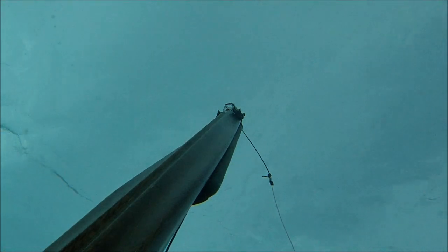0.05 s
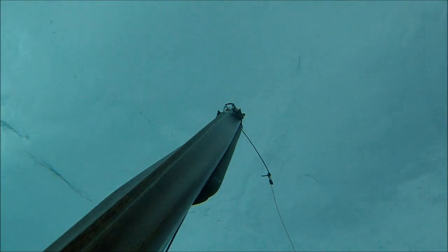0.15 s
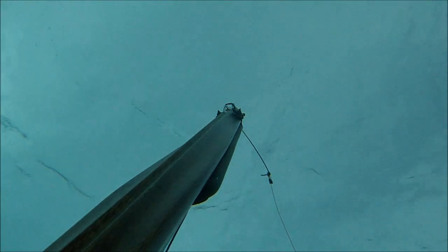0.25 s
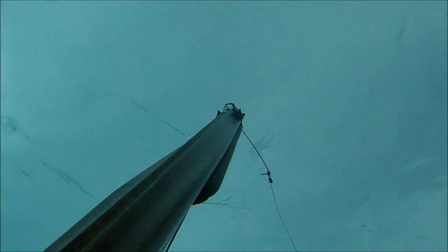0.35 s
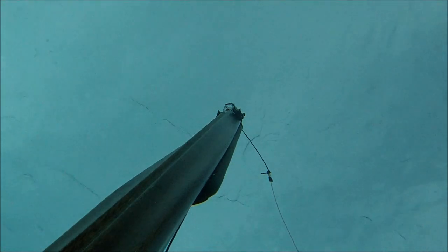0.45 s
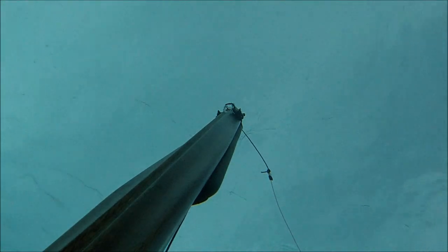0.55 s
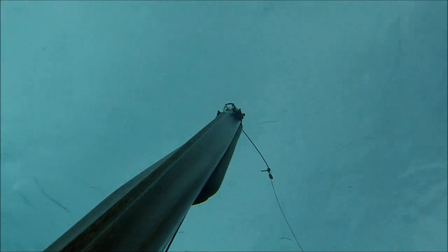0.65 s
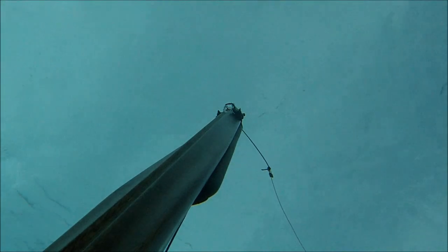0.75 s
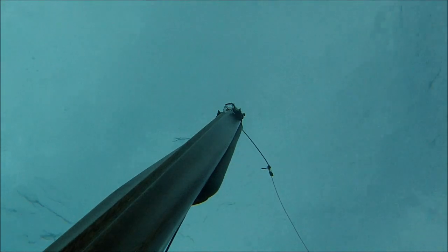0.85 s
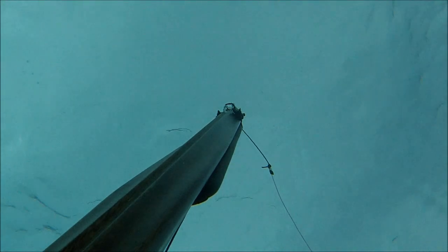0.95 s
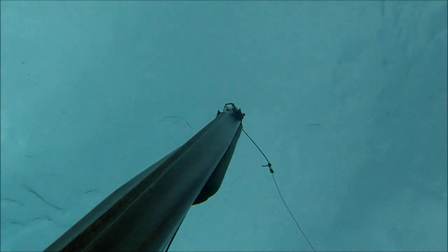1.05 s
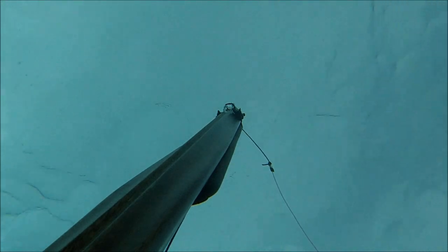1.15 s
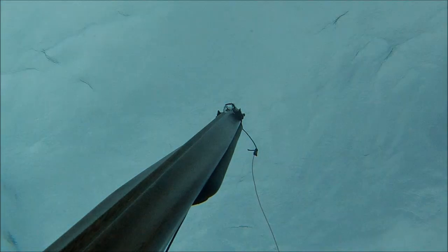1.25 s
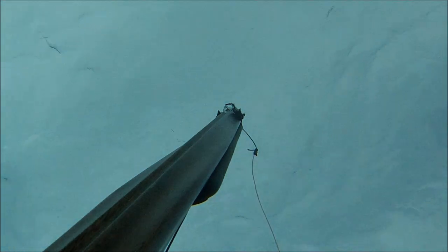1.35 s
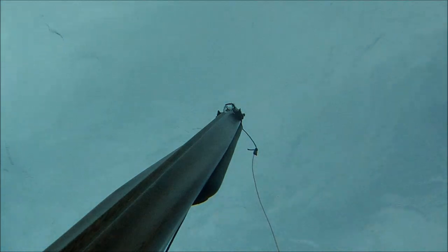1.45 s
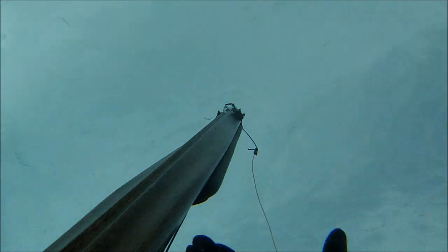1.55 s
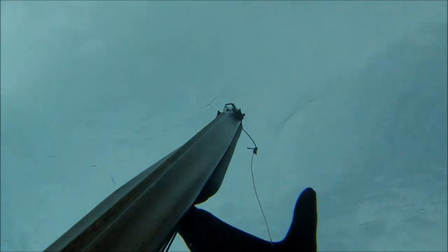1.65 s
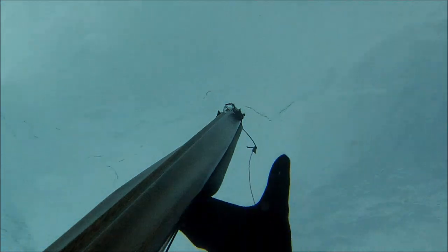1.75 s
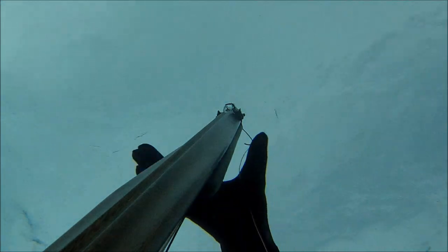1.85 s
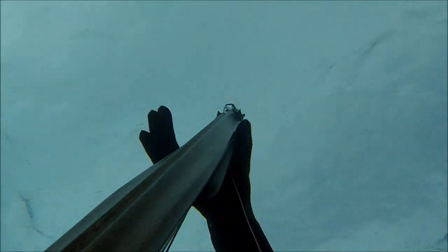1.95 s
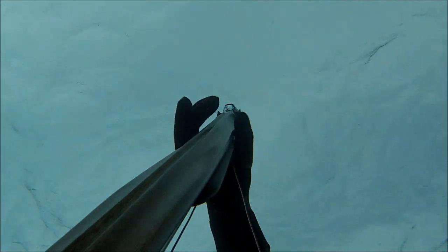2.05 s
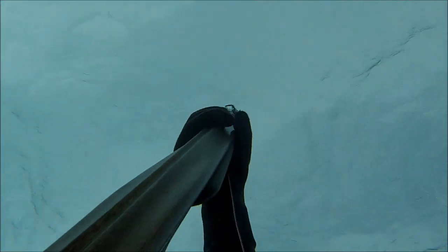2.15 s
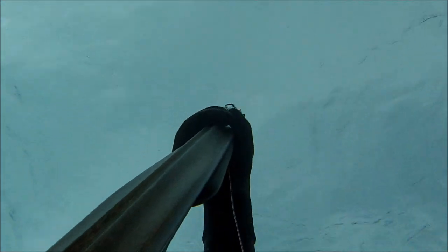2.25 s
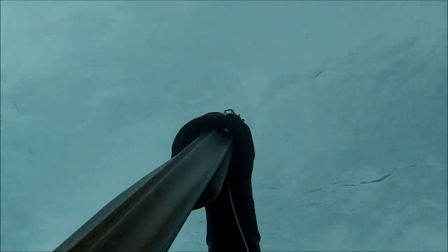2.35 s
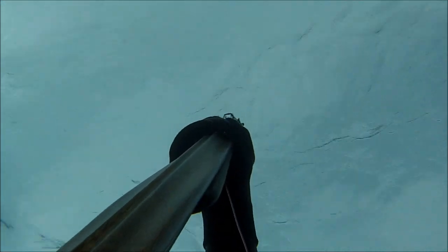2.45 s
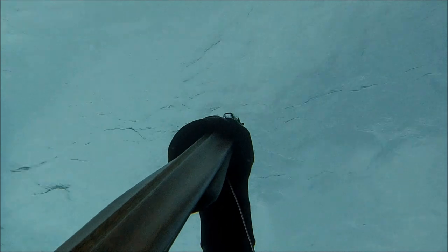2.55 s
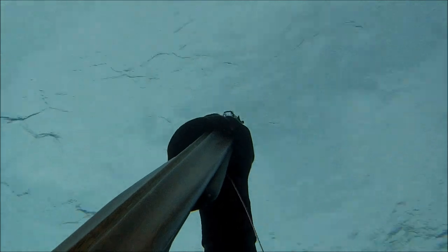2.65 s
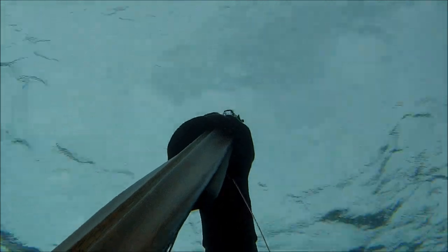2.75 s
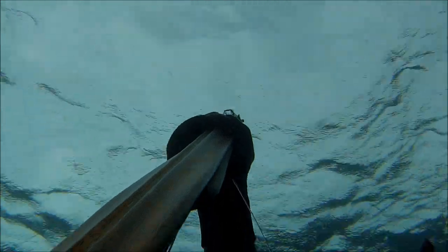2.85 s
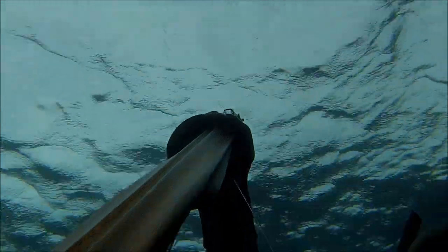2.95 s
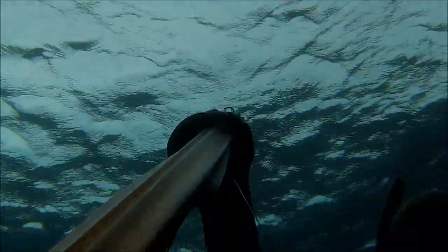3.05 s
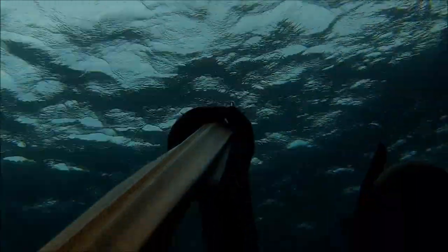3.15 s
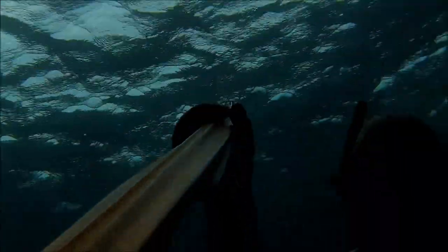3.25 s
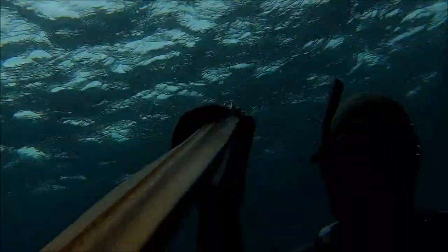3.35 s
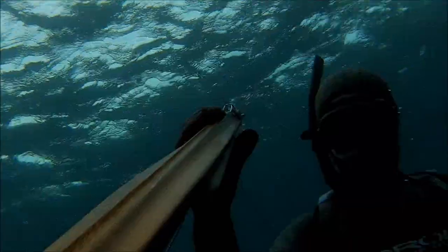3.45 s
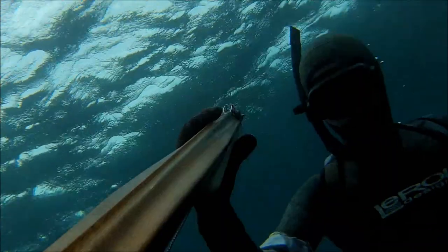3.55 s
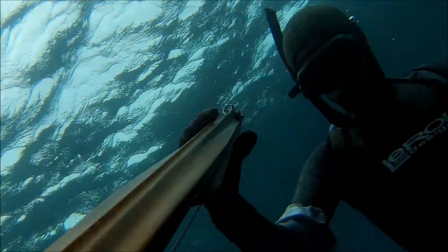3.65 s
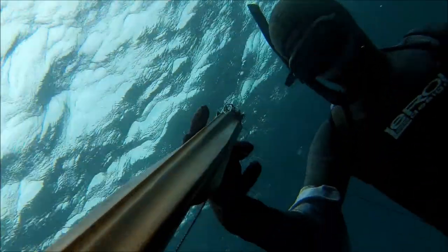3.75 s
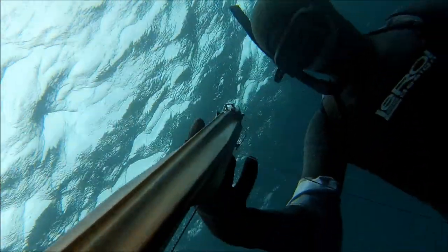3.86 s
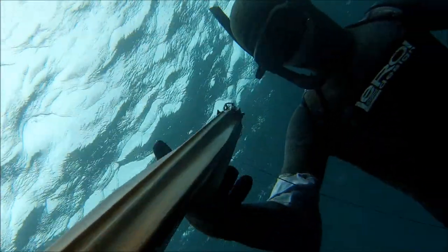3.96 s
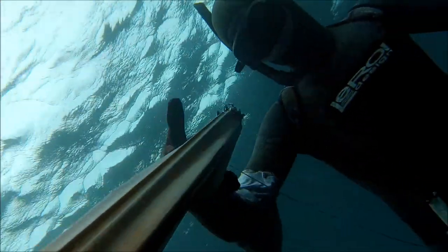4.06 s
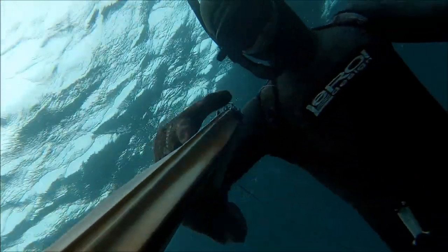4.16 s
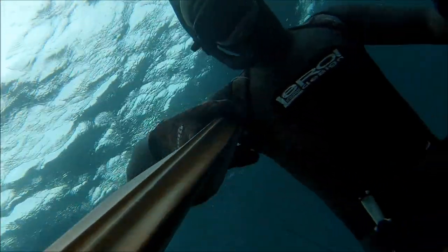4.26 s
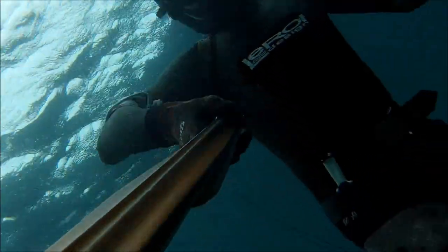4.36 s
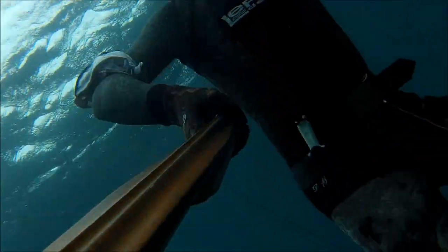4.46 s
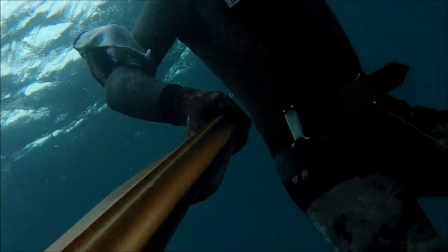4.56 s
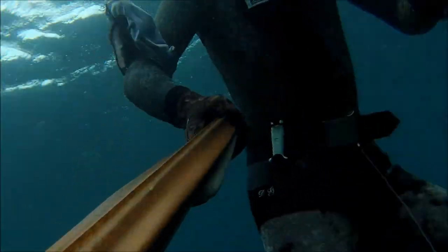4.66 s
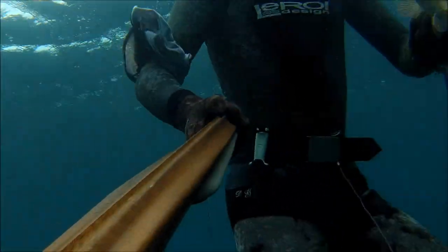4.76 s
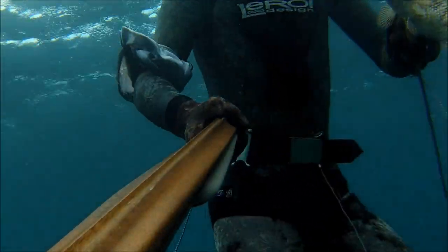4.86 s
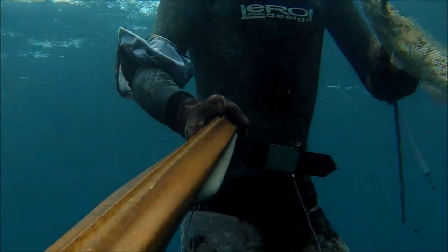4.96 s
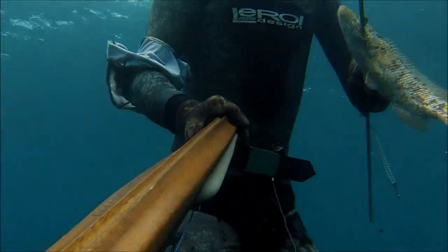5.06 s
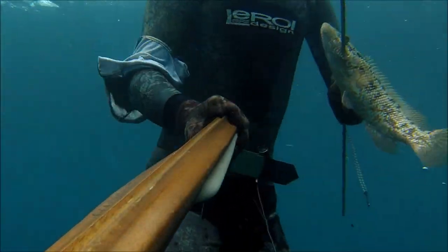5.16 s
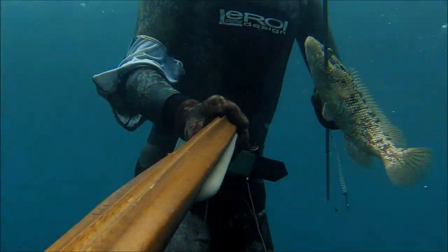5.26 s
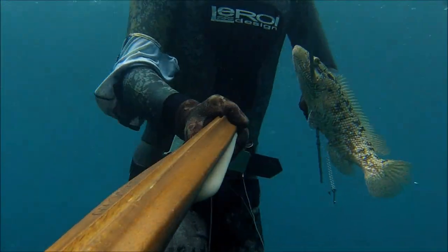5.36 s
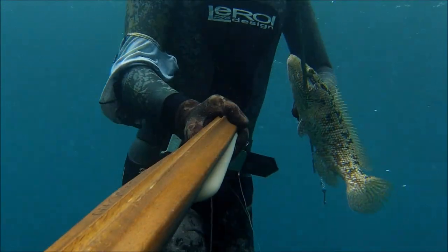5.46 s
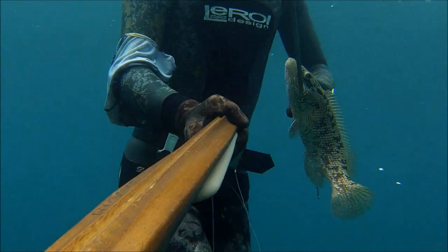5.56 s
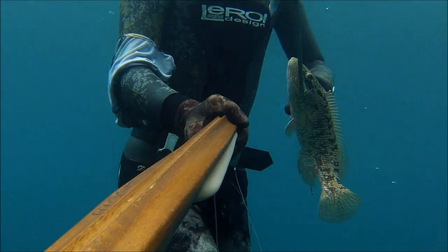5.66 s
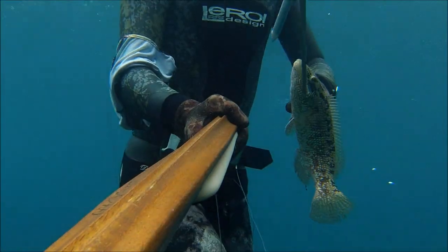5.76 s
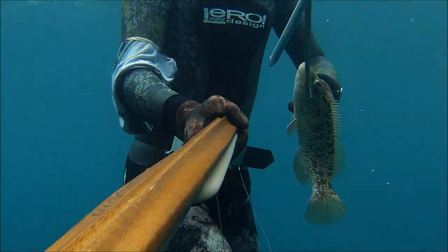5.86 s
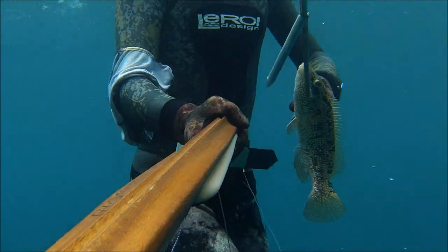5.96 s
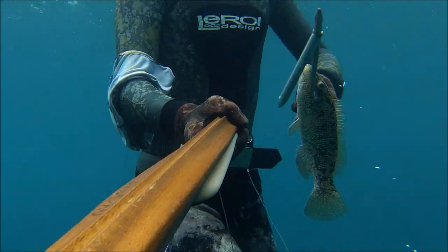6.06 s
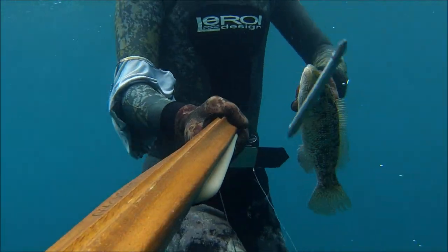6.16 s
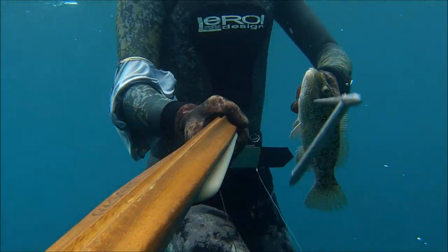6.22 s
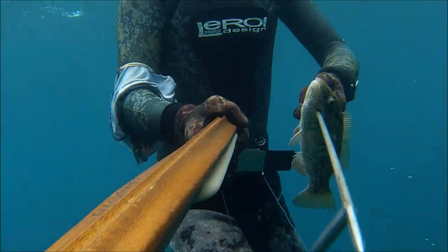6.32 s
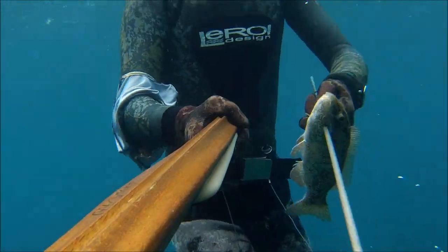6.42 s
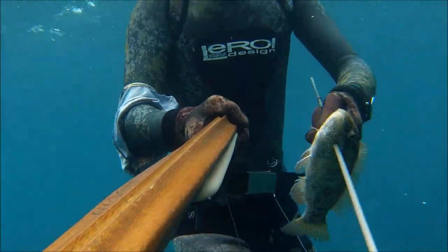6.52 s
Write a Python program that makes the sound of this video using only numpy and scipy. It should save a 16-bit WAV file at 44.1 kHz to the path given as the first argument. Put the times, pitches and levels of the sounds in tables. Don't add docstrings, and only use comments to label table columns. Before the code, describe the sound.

Underwater, through the housing of a camera clamped to a wooden speargun. From 0 to 2 s it is quiet: faint uneven wash, fine shrimp crackle with brighter snaps, thin high recorder hiss pulsing on and off, faint gritty rubs and a few light ticks near 0.3, 1.0 and 1.65 s. At about 2.05 s a gloved hand closes on the barrel; deep throbbing and dragged water rise, with a strong heave at 2.3 s. Clumped knocks and dull bumps strike at 2.55-2.85 and 3.05 s. At 3.33 s steel hits the housing, by far the loudest event, bouncing rapidly with a brief hollow ring, then again more weakly at 3.45 s. From 3.6 to 5 s, heavy low heaves and shudders dominate, with muffled rubbing. Afterwards the throbs subside; small clicks cluster at 5.65 s, a firmer knock lands at 6.29 s, and scrapes and snaps carry on to 6.6 s.

```python
import sys
import numpy as np
from scipy import signal
from scipy.fft import rfft, irfft, next_fast_len
from scipy.io import wavfile
from scipy.ndimage import uniform_filter1d, map_coordinates

SR = 44100
rng = np.random.default_rng(int(sys.argv[2]) if len(sys.argv) > 2 else 0)


def pcm_store(signal):
    levels = np.round(np.clip(np.atleast_2d(signal), -1, 1) * 32767)
    wavfile.write(sys.argv[1], SR, levels.astype(np.int16).T)


def level_to_linear(level):
    exponent = np.asarray(level, float) / 20
    return 10 ** exponent


N = 290619


def unit(x):
    return x / np.sqrt(np.mean(x ** 2) + 1e-20)


def curves(rows):
    s, *cols = np.transpose(rows)
    return [np.interp(np.arange(N) / SR, s, c) for c in cols]


def wobble(rate_hz):
    at = np.arange(0, N + 16, 16)
    knots = rng.standard_normal(int(N * rate_hz / SR) + 4)
    return np.interp(np.arange(N), at, map_coordinates(knots, [at * rate_hz / SR]))


def filtered(x, response):
    m = next_fast_len(N + SR // 2)
    return irfft(rfft(x, m) * response(np.fft.rfftfreq(m, 1 / SR)), m)[..., :N]


def dulled(x, top_hz):
    return signal.sosfilt(signal.butter(4, top_hz, fs=SR, output="sos"), x)


def coloured(spectrum):
    hz, db = np.transpose(spectrum)
    noise = rng.standard_normal(N)
    return unit(filtered(noise, lambda f: level_to_linear(np.interp(np.log(f + 1), np.log(hz + 1), db))))


def ringing(x, modes):
    def response(f):
        total = 0
        for k, (hz, width_hz, db) in enumerate(modes):
            total = total + (-1) ** k * level_to_linear(db) * 1j * f * width_hz / (hz * hz - f * f + 1j * f * width_hz)
        return total * SR / (2 * np.pi * sum(width_hz * level_to_linear(db) for _, width_hz, db in modes))
    return filtered(x, response)


def tone(hz):
    return np.sqrt(2) * np.sin(2 * np.pi * np.cumsum(hz * np.ones(N)) / SR)


def gate(spans, gains, soft_s):
    x = np.zeros(N + SR)
    for (start, end), gain in zip(spans, gains):
        x[round(start * SR):round(end * SR)] += gain
    return uniform_filter1d(x, int(soft_s * SR) + 1)[:N]


def swells(s, db, t60_s, rise_db_per_s):
    at = np.arange(0, N + 64, 64)
    t = at / SR - np.array(s)[:, None]
    slope = np.where(t < 0, rise_db_per_s, -60 / np.clip(t60_s, .05, 9)[:, None])
    gain = np.sqrt(np.sum(level_to_linear(2 * (db[:, None] + slope * t)), 0))
    return np.interp(np.arange(N), at, gain)


def blows(times, levels_db, t60s, scrape_db):
    x, t = np.zeros(N + SR), np.arange(SR // 5) / SR
    for s, db, t60 in zip(times, levels_db, t60s):
        grit = rng.standard_normal(len(t)) * rng.exponential(size=len(t))
        burst = level_to_linear(scrape_db - 60 * t / np.clip(t60, .004, .3)) * grit
        burst[0] = 1
        x[round(s * SR):][:len(t)] += level_to_linear(db) * burst
    return x[:N]


# time in seconds, pressure in dB.
GRIP_PRESSURE = [(0, -9), (.27, -2.5), (1, -16.5), (1.87, -13.5), (2.4, 7), (3.1, -2), (3.28, 4.5),
                 (3.78, -0.5), (4.09, 5.5), (4.4, 6.5), (4.68, 6), (5.17, -4), (5.73, -8.5), (6.59, -17)]
# level in dB at middle pressure, growth in dB per dB of pressure.
RESTING_GRIT = [
    (-56, 1.4),
    (-56.5, 1.22),
    (-64, 1.38),
]


def resting():
    press_db, = curves(GRIP_PRESSURE)
    return [db + grows * press_db for db, grows in RESTING_GRIT]


# pitch in Hz, level in dB rms.
WHINE = [(11130, -82)]
WRITES = [.05, .23, .38, .65, .92, 1.4, 1.47, 1.54, 1.73, 1.99, 2.21, 2.41, 2.58, 2.81, 3.12, 3.36, 3.63,
          3.84, 4.05, 4.22, 4.44, 4.69, 4.95, 5.17, 5.36, 5.56, 5.75, 6.01, 6.21, 6.42]


def electronics():
    write_s = 0.074
    hiss = coloured([(8000, -61), (9600, 7.5), (10600, 5.0), (12000, 4), (13500, -34)])
    writing = gate([(s, s + write_s) for s in WRITES], np.ones(len(WRITES)), soft_s=0.0073)
    return level_to_linear(-68.5) * writing * hiss + sum(level_to_linear(db) * tone(hz) for hz, db in WHINE)


# frequency in Hz, density in dB per Hz.
WASH = [(15, -8), (45, 2), (90, -2.5), (200, -13), (620, -10.5), (1000, -20.5), (1600, -22.5),
        (2360, -26.5), (2900, -24), (7100, -31), (10600, -28.5), (15500, -36.5)]


def water():
    hz, _, z = signal.stft(coloured(WASH), SR, nperseg=512)
    patches = uniform_filter1d(rng.standard_normal(z.shape), 8, 0)
    patches = unit(uniform_filter1d(patches, 6, 1))
    depth_db = np.interp(hz, [100, 1000, 11000, 14000], [1.2, 3.54, 1.8, 3.4])[:, None]
    wash = signal.istft(z * level_to_linear(depth_db * patches), nperseg=512)[1][:N]
    return level_to_linear(-56.5) * unit(wash)


# frequency in Hz, width in Hz, level in dB.
SNAP_LOW = [(2320, 270, 2), (3780, 343, -3.5)]
SNAP_TOP = [(4560, 1230, 1), (7190, 930, 2.5), (10430, 1000, -0.5), (13600, 2100, -10.5)]
# start in seconds, peak in dB.
FAR = [(.02, -57), (0.077, -45), (0.2494, -47), (1.52, -42), (1.647, -34.5), (1.764, -45.5), (1.854, -42.5),
       (2.1826, -44.5), (2.4102, -46), (2.47, -46.5), (2.6327, -48.5), (2.751, -45), (2.959, -49),
       (3.972, -39.5), (4.6665, -40), (4.74, -36), (5.042, -46), (5.436, -39), (6.352, -45.5), (6.438, -44),
       (0.574, -49), (.825, -62), (.94, -50), (1.441, -46), (1.5, -51), (1.73, -56), (1.829, -46),
       (1.895, -54), (2.3, -53), (4.369, -42), (4.8, -49), (4.815, -50), (5.282, -54), (5.633, -52),
       (5.895, -56), (6.0, -45), (6.526, -52)]
NEAR = [(0.0533, -44.5), (0.607, -40.5), (0.77, -45.5), (0.978, -39), (2.081, -48), (3.0074, -44.5),
        (4.111, -42.5), (4.204, -44.5), (4.239, -44.5), (4.43, -48), (4.51, -36), (4.5615, -51.5),
        (4.9533, -37.5), (5.256, -47.5), (5.313, -40), (5.499, -43.5), (5.7655, -32.5), (5.93, -38),
        (5.988, -39.5), (6.098, -49), (6.138, -49), (6.216, -48.5), (6.4708, -43)]
SMALL = [(0.912, -48.5), (1.9118, -54), (2.7, -58), (2.88, -50.5), (3.04, -52), (3.313, -67), (4.688, -51),
         (4.856, -52), (4.94, -51), (5.82, -50), (1.422, -55.5), (2.054, -62), (2.105, -60), (2.29, -57),
         (3.3, -72), (4.862, -52.5), (6.558, -55), (6.58, -56.5), (4.53, -59)]


def shrimp():
    s, db = np.transpose(FAR + NEAR + SMALL)
    top_db = np.repeat([-19, -12, -3.5], [len(FAR), len(NEAR), len(SMALL)])
    life_s = np.full(len(s), .03)
    snaps_per_s = 260 * (1 + gate([(4.4, 4.95)], [.6], soft_s=.05))
    crackle = (rng.random(N) < snaps_per_s / SR) * level_to_linear(-56 + 4.4 * np.tanh(rng.standard_normal(N)))
    crackle = crackle * (1 + level_to_linear(resting()[2] + 51.5))
    low = blows(s, db, life_s, scrape_db=-15.5) + crackle
    top = blows(s, db + top_db + 8.0, 1.03 * life_s, scrape_db=-5.5) + 2.33 * crackle
    return ringing(low, SNAP_LOW) + ringing(top, SNAP_TOP)


# frequency in Hz, width in Hz, level in dB.
BARREL_MODES = [(169, 90, -4), (282.7, 51, 5), (381.4, 121.4, 2)]
RUBBED_WALLS = [(660, 42, 0), (810, 130, -10)]
RUBBED_CLAMP = [(950, 200, -15), (1250, 90, -6), (1520, 110, -4), (1710, 150, 0), (2150, 400, -22)]
# start in seconds, length in seconds, low dB, dull dB.
WOOD_SLIDES = [(0.105, 0.082, -57.5, -51.5), (0.338, 0.054, -57, -48), (0.537, 0.038, -57, -56),
               (0.616, 0.025, -77, -56), (1.116, 0.12, -79, -55.5), (1.383, .06, -66, -57),
               (2.298, 0.056, -46.5, -55), (5.233, 0.024, -49, -60), (5.71, 0.041, -56, -55),
               (2.058, 0.044, -48.5, -54), (2.163, 0.036, -37.5, -68), (3.599, 0.066, -46, -51),
               (3.8, 0.14, -47, -58), (4.257, 0.057, -43.5, -52), (4.365, 0.088, -53, -50),
               (5.618, 0.087, -51, -43), (5.981, 0.091, -47, -55), (6.24, 0.052, -49, -41),
               (6.293, 0.037, -50, -46), (6.403, 0.036, -62, -43)]
CLAMP_SLIDES = [(2.589, 0.021, -42, -43), (2.688, 0.039, -28.5, -37), (3.096, 0.05, -42, -43.5),
                (3.196, 0.029, -69, -60), (3.373, 0.067, -56, -53), (3.471, 0.136, -58, -57),
                (3.858, 0.15, -63, -51.5), (3.996, 0.043, -72, -44.5), (4.559, 0.057, -40, -58.5),
                (4.742, 0.13, -43, -55), (5.111, 0.022, -50, -60), (5.353, 0.048, -49, -63),
                (4.486, 0.019, -41.5, -73), (5.782, 0.016, -48, -58), (5.834, 0.066, -50.5, -57.5),
                (6.563, .008, -58, -51)]


def glove():
    s, length_s, low_db, dull_db = np.transpose(WOOD_SLIDES + CLAMP_SLIDES)
    spans = np.transpose([s, s + length_s])
    bright_db = dull_db + np.repeat([-22, -1.3], [len(WOOD_SLIDES), len(CLAMP_SLIDES)])
    slides_db = [low_db, dull_db, bright_db]
    total = np.zeros(N)
    for rest_db, slide_db, modes in zip(resting(), slides_db, [BARREL_MODES[1:], RUBBED_WALLS, RUBBED_CLAMP]):
        level = level_to_linear(rest_db - 9.5 + 6.3 * np.tanh(wobble(14)))
        level = level + gate(spans, level_to_linear(slide_db - 3.5), soft_s=0.013)
        clumps = level_to_linear(3.06 * wobble(35) + 2.6 * wobble(140))
        total += level * unit(ringing(clumps * rng.standard_normal(N), modes))
    return dulled(total, top_hz=2360)


# start in seconds, peak
# in dB, pitch in Hz.
TAPS = [(0.277, -35, 1350), (.318, -47, 2450), (.533, -44.5, 1510), (.96, -47, 1650), (0.982, -33, 2450),
        (1.647, -32.5, 4770), (1.648, -34, 9600), (2.157, -44, 2530), (2.156, -31, 680), (2.692, -29, 870),
        (6.286, -25, 1064), (2.245, -47, 1260), (2.451, -50, 1600), (2.498, -40, 1420), (2.592, -37, 1800),
        (2.593, -27.5, 878), (2.604, -35, 1410), (2.69, -24, 1390), (2.724, -31, 925), (2.729, -43, 1600),
        (2.85, -43, 1760), (3.071, -43, 1800), (3.1, -44, 1500), (4.076, -49, 1250), (4.11, -46, 1930),
        (4.206, -42, 1400), (4.317, -58, 960), (4.429, -46, 1200), (4.515, -42, 1340), (4.57, -41, 1300),
        (4.585, -43, 1630), (4.861, -49, 1300), (5.112, -53, 1580), (5.195, -50, 1500), (5.205, -55, 1600),
        (5.277, -46.5, 679), (5.358, -46, 1620), (5.378, -42, 1510), (5.37, -44, 670), (5.619, -42, 1610),
        (5.64, -52, 1500), (5.646, -54, 1600), (5.657, -29.5, 1540), (5.664, -36, 1760), (5.678, -39, 1350),
        (5.717, -51, 2400), (5.86, -49, 1500), (5.875, -56, 1600), (5.961, -43, 1320), (5.969, -49, 1480),
        (5.9825, -36.5, 1540), (6.019, -45, 1500), (6.173, -48, 2200), (6.33, -51, 1190), (6.416, -52, 930),
        (6.455, -46, 1300), (6.562, -39.5, 1630)]
# start in
# seconds, peak in dB, pitch in Hz.
LUMPS = [(2.17, -41, 534), (2.186, -43, 305), (2.7014, -16, 384), (3.878, -32, 613), (5.612, -35, 705),
         (5.642, -40, 724), (5.659, -29, 690), (5.663, -33, 780), (5.986, -51, 690), (5.994, -45, 700),
         (6.039, -37, 660), (6.256, -44, 673), (6.293, -33, 750), (3.328, -23, 403), (3.3281, -22, 510),
         (2.717, -28, 298), (6.577, -47, 600), (.35, -37, 645), (.37, -47, 700), (3.4519, -19.5, 760),
         (2.845, -31, 904), (3.042, -24, 870), (6.428, -37, 640), (6.4445, -35.5, 976), (6.456, -42, 900)]


def taps():
    x, t = np.zeros(N + SR), np.arange(SR // 20) / SR
    for rows, cycles_to_60db in [(TAPS, 34.3), (LUMPS, 19.5)]:
        for s, db, hz in rows:
            rough = 1 + 0.28 * unit(uniform_filter1d(rng.standard_normal(len(t)), size=30))
            level = level_to_linear(db - 60 * t * hz / cycles_to_60db) * (1 - np.exp(-t / 0.0003))
            x[round(s * SR):][:len(t)] += level * rough * np.sin(2 * np.pi * hz * t)
    return x[:N]


# frequency in Hz, width in Hz, level in dB.
DAMPED_WALLS = [(522, 107, -5), (640, 70, 4.5), (904, 62, -1.5)]
PORT = [(2920, 450, 0), (3450, 330, 8), (5050, 420, -4)]
# click in Hz, lens port crack in dB for a middling click.
FITTINGS = [
    (1050, -63),
    (1400, -54),
    (2200, -67),
]
# start in seconds, peak in dB, thud in dB, click in dB.
ON_WOOD = [(0.348, -36, -12, -13), (1.03, -41.5, -9, -19), (2.154, -46, 3, -35), (2.708, -24, -9, 3.5),
           (2.85, -45, -6, -16), (3.07, -28, -3.5, -6), (3.15, -48.5, 13.5, 10), (4.271, -44, 1, 5.5),
           (4.368, -49.5, 12, -4), (4.659, -47, 2, 4), (4.715, -33, -8, -5), (4.772, -47, 12.5, -27.5),
           (5.236, -43, 0, -36), (5.447, -37.5, -6.5, -9), (6.023, -34.5, -4, -10),
           (6.285, -24.5, -6, -1.5), (6.293, -44, -25, -25), (6.309, -39, -4, -2), (6.444, -38, -5, -5)]
ON_CLAMP = [(0.274, -43, -1, 11.5), (0.525, -37, -23, -13), (2.488, -37.5, 7.5, -23), (2.565, -28.5, 1, 6),
            (2.583, -27, -8, -7), (2.589, -32, -2, -8), (2.7, -22, 6.5, 3), (2.716, -29.5, -2, -3),
            (2.841, -23, -2, 6), (3.0396, -25, 3, 8), (3.048, -29, -21, 2.5), (3.116, -35, -4, 3.5),
            (3.126, -36, -18, -1), (3.229, -44.5, -0.5, 0.5), (3.901, -46.5, 14, -16),
            (4.973, -31.5, -7.5, -5), (5.39, -54.5, 11, -13), (5.58, -43, -16, -12), (5.656, -29, -31, -13),
            (5.624, -44, -18, -19), (5.643, -39, -24, -20), (5.668, -32.5, -8, -18), (5.69, -40.5, -9, -8),
            (5.964, -52.5, 16, -7), (5.985, -51, 8, -8), (6.562, -41, -4, -10)]
ON_SWIVEL = [
    (.311, -44.5, -0.5, -10),
    (.368, -47, -27, -1),
    (0.978, -38, -21, 5),
    (1.396, -43.5, -11, -9),
    (1.652, -43.5, -20, -6),
    (1.795, -44.5, -0.5, 0),
    (5.007, -41.5, 1, -18),
    (5.484, -40, -8, -9),
    (5.61, -33, -10, -2),
    (6.157, -41.5, -10, -21),
]


def knocks():
    s, db, thud_db, click_db = np.transpose(ON_WOOD + ON_CLAMP + ON_SWIVEL)
    part = np.repeat([0, 1, 2], [len(ON_WOOD), len(ON_CLAMP), len(ON_SWIVEL)])
    middling_db, crack_follows = -38, 0.64
    crack_db = np.transpose(FITTINGS)[1][part] + crack_follows * (db + click_db - middling_db)
    s, life_s = s + .0006, np.full(len(s), .035)
    body = ringing(blows(s, db + 2.5, life_s, scrape_db=-20.5), DAMPED_WALLS)
    body += ringing(blows(s, db + thud_db + 10.5, life_s, scrape_db=-23.5), BARREL_MODES)
    for k, (hz, _) in enumerate(FITTINGS):
        pushes = blows(s[part == k], (db + click_db)[part == k] + 29.0, 0.7 * life_s, scrape_db=-31)
        body += signal.lfilter(*signal.iirpeak(hz, 1.3, fs=SR), pushes)
    port = ringing(blows(s, crack_db + 4.0, 0.61 * life_s, scrape_db=-13), PORT)
    spread_s, spread_hz = .0005, 2000
    body = filtered(body, lambda f: np.exp(-2j * np.pi * spread_s * (2 * np.sqrt(spread_hz * f) - f)))
    return dulled(dulled(body, top_hz=2350), top_hz=2300) + dulled(port, top_hz=7150)


# frequency in Hz, t60 in seconds, level in dB.
FREE_WALLS = [(628, .09, 1.5), (772, .052, 2.5)]
# start in seconds, level in dB per wall.
HARD_BLOWS = [
    (3.3258, -9),
    (3.3345, -22),
]


def walls():
    x, t = np.zeros(N), np.arange(SR // 5) / SR
    rise = 1 - np.exp(-t / .003)
    for s, db in HARD_BLOWS:
        for hz, t60_s, own_db in FREE_WALLS:
            ring = level_to_linear(db + own_db - 60 * t / t60_s) * np.cos(2 * np.pi * hz * t)
            x[round(s * SR):][:len(t)] += rise * ring
    return dulled(x, top_hz=5000)


# frequency in Hz, width in Hz, level in dB.
STRUCK_WALLS = [(600, 37, 5), (850, 100, 0)]
STRUCK_CLAMP = [(1320, 320, 2.5), (1880, 420, 3.5), (2190, 320, 4)]
STRUCK_PORT = [(3550, 550, 4.5), (5160, 280, 3.5), (6300, 1950, -7), (7720, 240, -9), (9600, 610, -3.5),
               (3000, 380, -2.5)]
# start in seconds, peak in dB, click in dB, crack in dB, scrape t60 in seconds.
BOUNCES = [(3.325, -5.5, -5.5, -3.5, 0.02), (3.333, -12.5, -2, 1.5, 0.02), (3.341, -21, 0, 3, 0.025),
           (3.348, -22.5, -12, -9, 0.019), (3.353, -25.5, -6, -11, 0.022), (3.359, -35, -3, -28, 0.034),
           (3.37, -34.5, -5, -27, .03), (3.449, -18.5, -1, -10.5, 0.013), (3.4575, -25, -4, -22, 0.02),
           (3.4618, -26, -3, -22, .02), (3.466, -27.5, -4, -18, 0.024)]


def rattle():
    s, db, click_db, crack_db, t60_s = np.transpose(BOUNCES)
    s = s + 0.001172
    low = ringing(blows(s[3:7], db[3:7] - 3.5, t60_s[3:7], scrape_db=-16), STRUCK_WALLS)
    low += ringing(blows(s[7:], db[7:] - 1, t60_s[7:], scrape_db=-24), DAMPED_WALLS[1:])
    low += ringing(blows(s, db - 12.5, t60_s, scrape_db=-22), BARREL_MODES)
    low += ringing(blows(s, db + click_db + 14.5, 0.5 * t60_s, scrape_db=-23.0), STRUCK_CLAMP)
    port = ringing(blows(s, db + crack_db + 12.5, 0.27 * t60_s, scrape_db=-19.0), STRUCK_PORT)
    spike = dulled(blows(s, db + click_db + 6, 0.2 * t60_s, scrape_db=-22), top_hz=3900)
    return dulled(low, top_hz=2800) - spike + dulled(port, top_hz=7350) + level_to_linear(-18.5) * port


# frequency in Hz, density in dB per Hz.
FLOW = [(26, -53), (45, 2.5), (57, -11.5), (87, -12.5), (226, -28), (293, -30.5), (500, -42), (650, -58),
        (1100, -120)]
# peak in seconds, level in dB, t60 in seconds.
HEAVES = [(2.15, -27, 0.36), (2.302, -15.5, 2.1), (2.6, -29.5, 8.7), (3.098, -31, 0.38),
          (3.35, -25.5, 0.41), (3.58, -21.5, 1.6), (3.89, -16.5, 2.2), (4.16, -16, 1.7), (4.46, -14.5, 1.5),
          (4.708, -14.5, 0.2), (4.85, -12.5, 0.34), (5.079, -20, 0.43), (5.36, -21, 0.33),
          (5.509, -19, 0.07), (5.68, -26.5, 0.13), (5.92, -27.5, 2.2), (6.03, -26.5, 1), (6.34, -27, 8.7)]
JERKS = [(2.15, -20, 0.56), (2.3, -29, 0.88), (2.54, -30, 0.17), (2.85, -31, 0.78), (3.58, -21.5, 6.2),
         (3.77, -23, 4.5), (4.1, -47, 0.88), (4.29, -23.5, 2.2), (4.41, -22, 0.21), (4.63, -21.5, 0.44),
         (4.78, -30, 0.35), (5.08, -28.5, 0.53), (5.36, -30, 0.19), (5.51, -46, 0.26), (6.03, -26, 3.7),
         (6.58, -28, 1.1)]
# peak in seconds, first mode dB, second mode dB, first t60 in seconds.
BUMPS = [(2.071, -50, -30.5, 0.18), (2.165, -30, -26.5, 0.19), (2.5, -40.5, -36, 0.46),
         (2.72, -44.5, -55.5, 0.91), (3.221, -43.5, -59, .3), (3.41, -41, -48, 0.32), (3.62, -77, -62, .3),
         (3.82, -67, -43.5, 0.33), (3.909, -25.5, -28.5, 0.95), (3.99, -33, -62, 0.58),
         (4.07, -29.5, -60, 0.51), (4.23, -36, -56, 0.55), (4.3, -50, -51, .5), (4.346, -28.5, -29, 0.29),
         (4.39, -28, -46, 0.28), (4.429, -33, -25.5, 0.18), (4.51, -47, -40, 0.16), (4.67, -38, -71, 0.34),
         (4.77, -39, -47, 0.51), (4.95, -71, -46, 0.26), (5.05, -62, -44, .3), (5.9, -48.5, -43.5, 0.48),
         (6.012, -64, -38, 0.24), (6.58, -66, -44, .3)]
TREMOR_DB = (-36.5, -38, -60, -57, -53.5)


def barrel():
    grip_s, close_s = 2.02, 0.029
    held = np.clip((np.arange(N) / SR - grip_s) / close_s, 0, 1)
    tremor = level_to_linear(TREMOR_DB)
    press = level_to_linear(0.6 * curves(GRIP_PRESSURE)[0])
    swaying = held * (swells(*np.transpose(HEAVES), rise_db_per_s=123) + tremor[0]) + level_to_linear(-61.5)
    shaking = held * (swells(*np.transpose(JERKS), rise_db_per_s=105) + tremor[1]) + level_to_linear(-56.5)
    s, first_db, second_db, t60_s = np.transpose(BUMPS)
    lower = swells(s, first_db, np.minimum(t60_s, 1), rise_db_per_s=920) + press * tremor[2]
    upper = swells(s, second_db, np.full(len(s), 0.1), rise_db_per_s=920) + press * tremor[3]
    sway = swaying * tone(17 * (1 + .09 * wobble(11)))
    shudder = shaking * level_to_linear(-5.0 + 1.54 * wobble(26)) * tone(35 * (1 + 0.153 * wobble(10)))
    flow = np.sqrt(shaking * (lower + press * tremor[4])) * level_to_linear(-7 + 4 * wobble(14)) * coloured(FLOW)
    first = lower * level_to_linear(-3.5 + .8 * wobble(8)) * tone(101.5 * (1 + 0.004 * wobble(8)))
    second = upper * level_to_linear(-1.0 + 1.7 * wobble(30)) * tone(175 * (1 + 0.0722 * wobble(25)))
    return sway + shudder + held * (flow + first + second)


def scene():
    mono = water() + shrimp() + glove() + taps() + knocks() + walls() - rattle() + barrel()
    return np.array([mono, mono])


def band_limit(x):
    return signal.sosfilt(signal.butter(12, 16110, fs=SR, output="sos"), x)


# start in seconds, end in seconds.
APART_SPANS = [
    (2.3, 2.45),
    (3.88, 3.98),
    (4.07, 4.3),
    (4.19, 4.1),
    (4.43, 4.61),
    (4.67, 4.68),
    (4.81, 4.83),
]
# frequency in Hz, density in dB per Hz.
APART = [(12, -27), (20, 8.5), (147, -14), (357, -16), (2480, -30), (2770, -31.5), (15000, -46.5)]
TRACE = [(100, -38), (300, -4.5), (1500, -3), (4000, -2), (8000, -2.5), (15000, -9)]


def record(dry):
    top_hz = 15300
    apart = gate(APART_SPANS, np.ones(len(APART_SPANS)), soft_s=0.026)
    coarse = level_to_linear(-49.5 + 0.26 * wobble(25.3)) * apart * coloured(APART)
    side = level_to_linear(-74.5) * coloured(TRACE) + coarse
    mix = dry + electronics() + side * [[1], [-1]]
    mix = filtered(mix, lambda f: 1 / (1 + (f / top_hz) ** 300))
    return band_limit(mix)


dry = scene()
out = record(dry)
pcm_store(out)
```